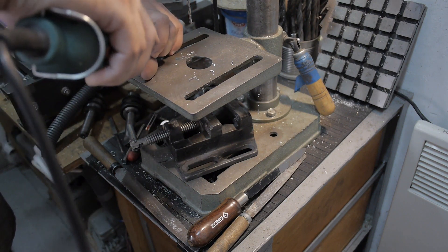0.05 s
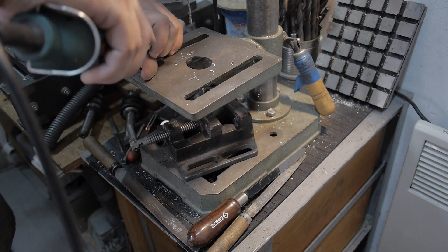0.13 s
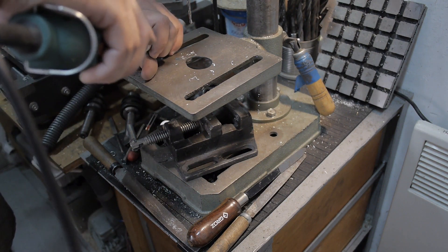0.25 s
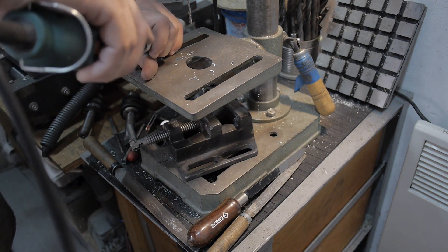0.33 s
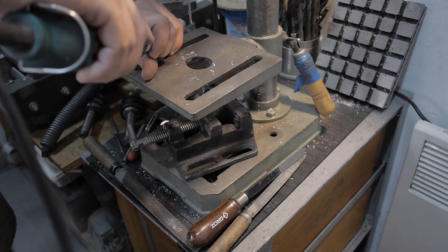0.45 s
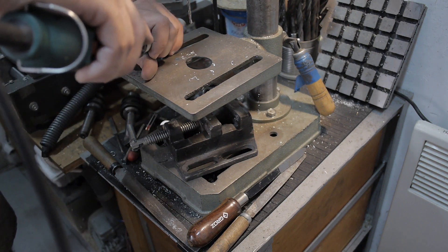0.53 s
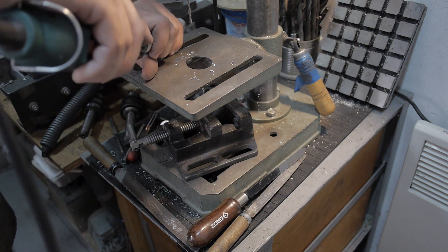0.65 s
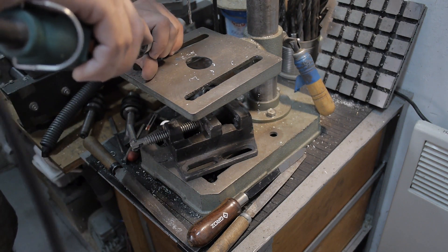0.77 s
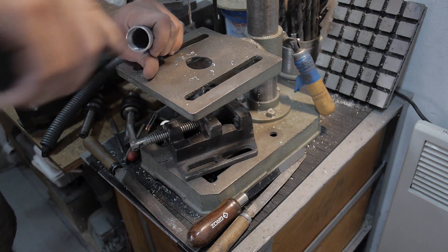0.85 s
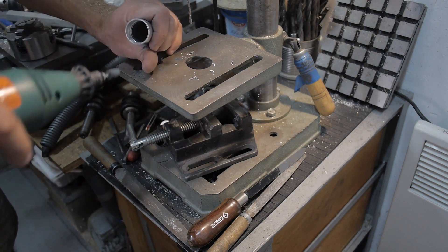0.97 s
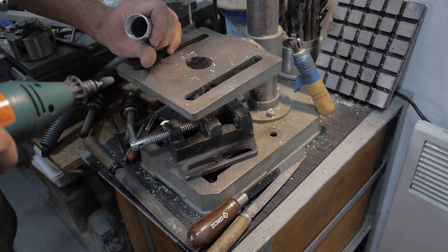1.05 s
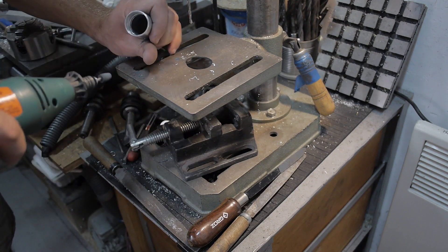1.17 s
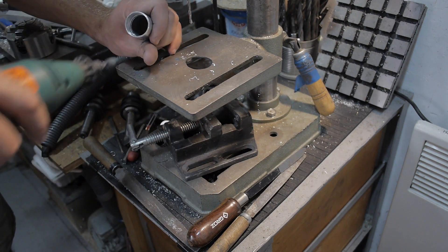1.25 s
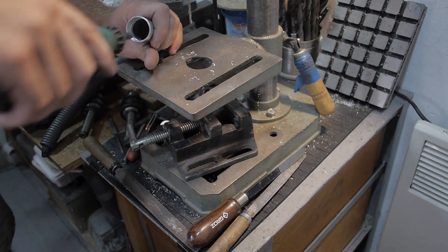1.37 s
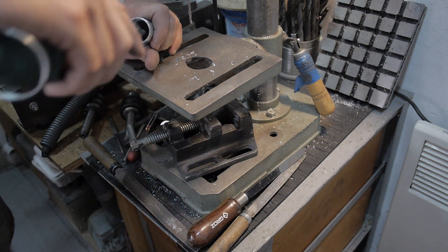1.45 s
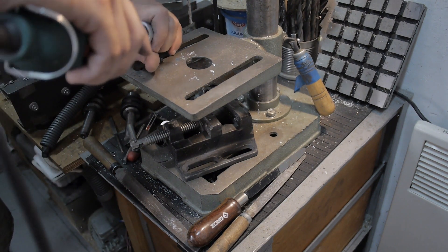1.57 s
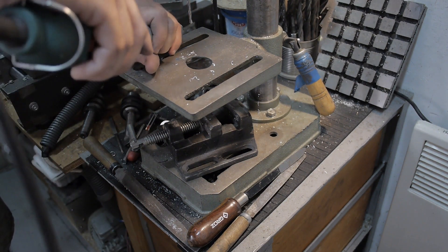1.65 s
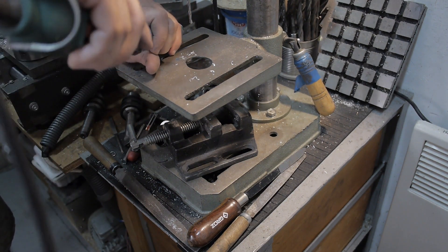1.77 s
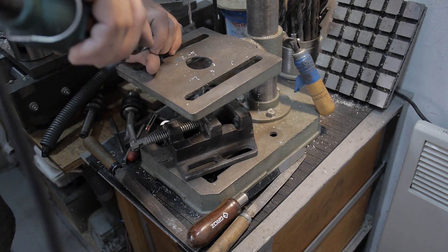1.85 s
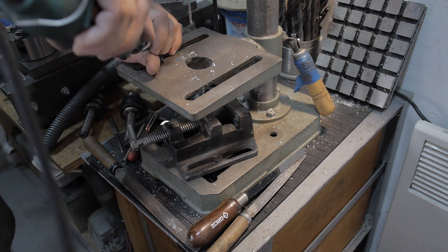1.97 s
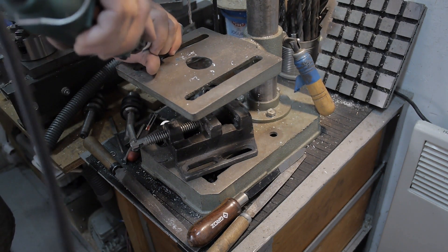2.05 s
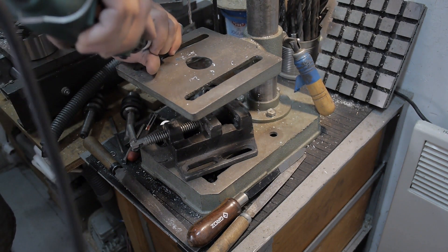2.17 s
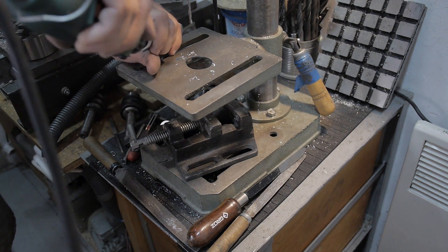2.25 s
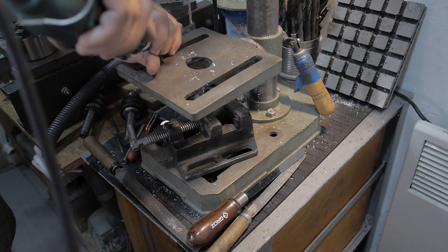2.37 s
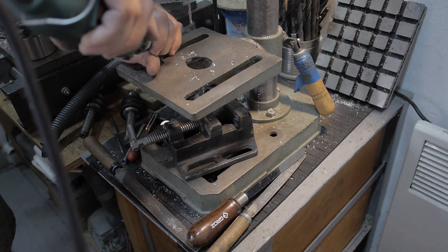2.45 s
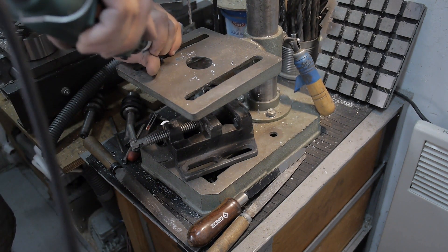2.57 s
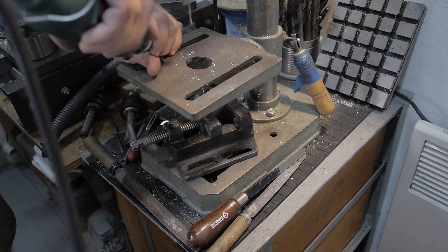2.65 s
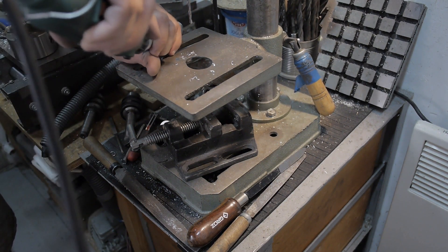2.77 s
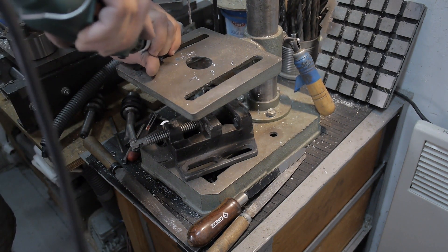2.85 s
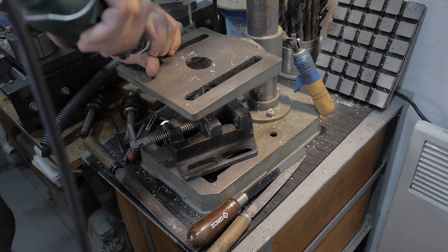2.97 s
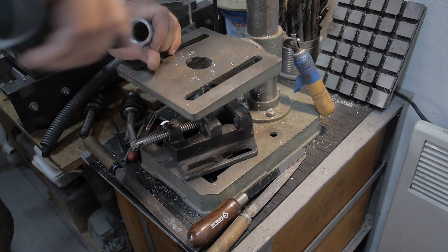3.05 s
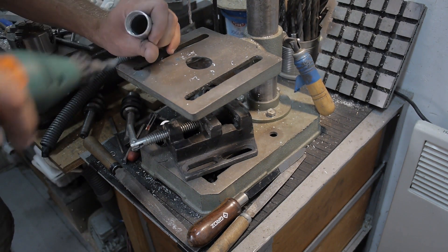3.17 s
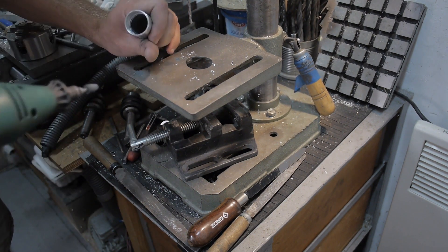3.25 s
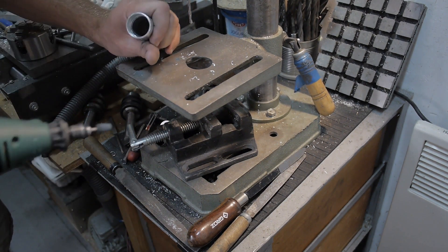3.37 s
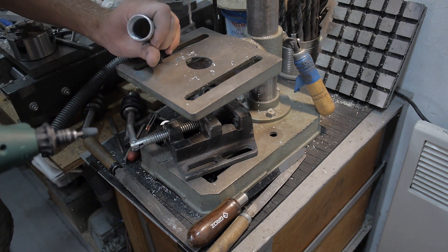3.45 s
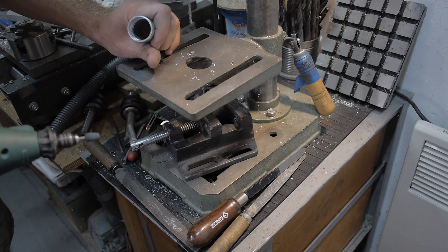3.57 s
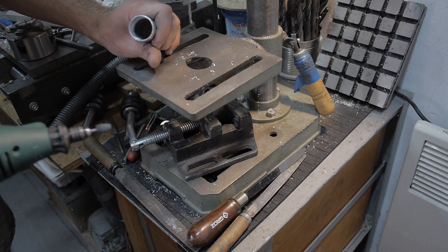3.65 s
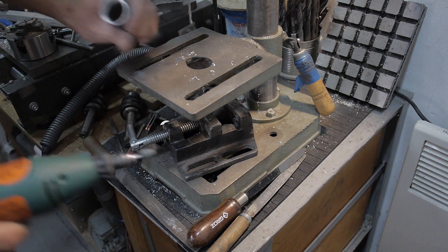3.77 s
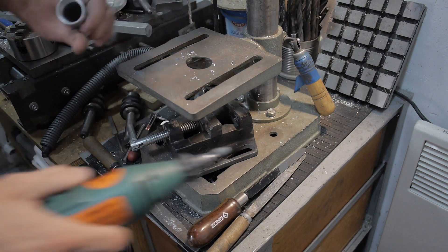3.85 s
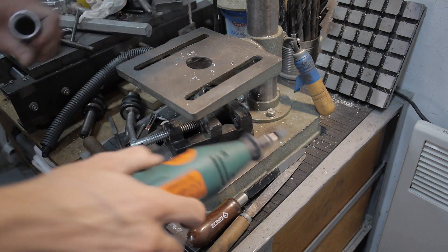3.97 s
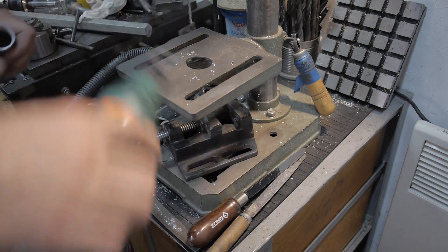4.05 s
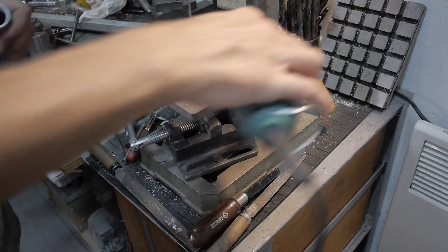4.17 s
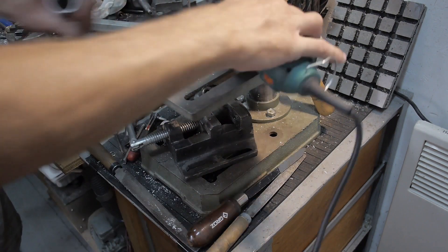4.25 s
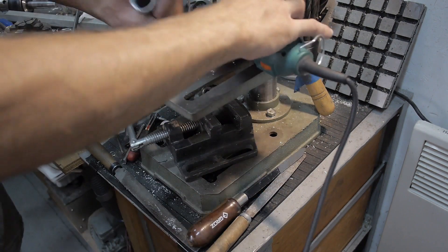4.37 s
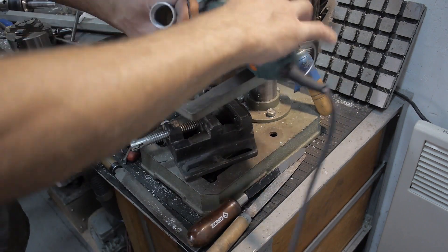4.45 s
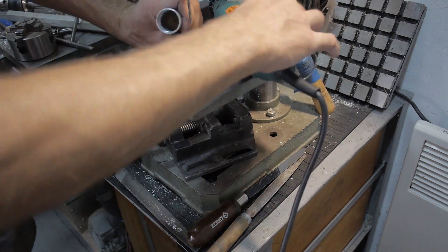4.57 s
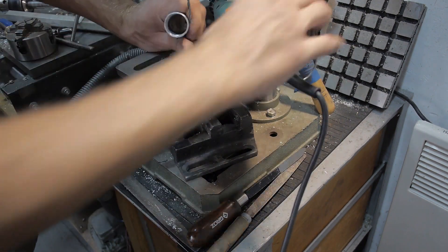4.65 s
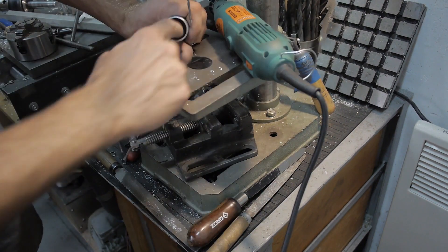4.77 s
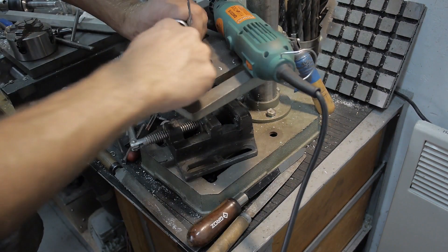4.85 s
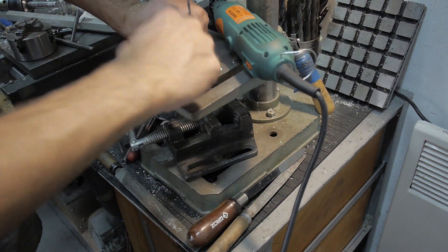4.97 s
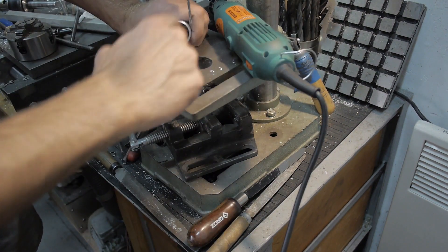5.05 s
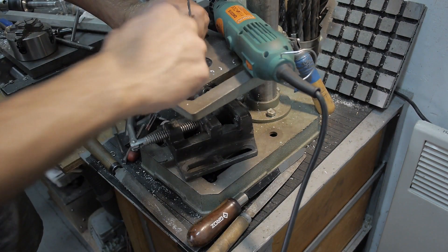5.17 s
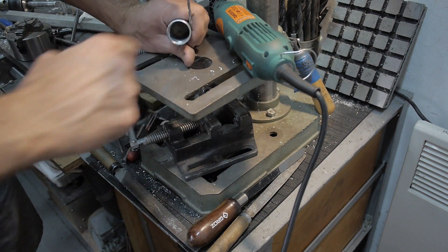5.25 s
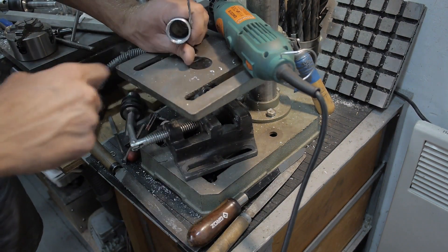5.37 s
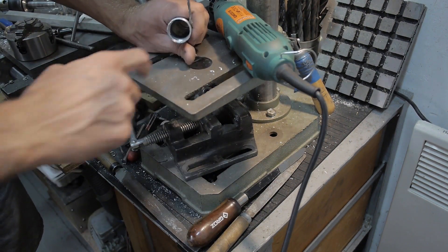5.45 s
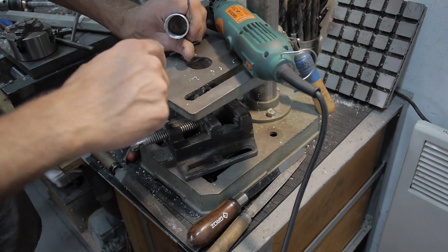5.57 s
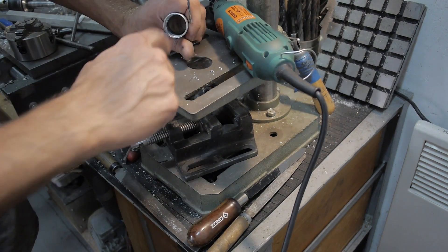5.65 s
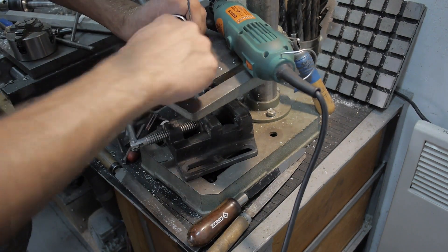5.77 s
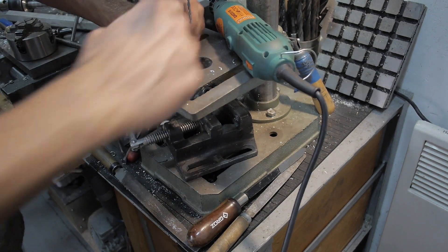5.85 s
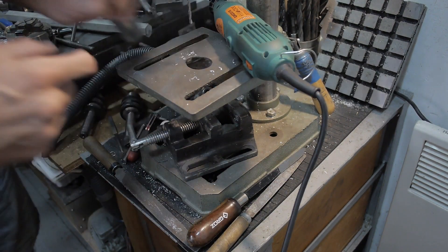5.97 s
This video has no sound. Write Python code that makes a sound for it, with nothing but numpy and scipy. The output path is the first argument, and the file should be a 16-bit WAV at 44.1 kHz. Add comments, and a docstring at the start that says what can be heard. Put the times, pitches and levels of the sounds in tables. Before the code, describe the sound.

A rotary tool grinds a steel ring in two harsh, raspy cuts, whining up between them, then coasts down and is set aside with knocks.

```python
"""A gritty rasp opens the scene: a mains rotary tool grinds a steel ring on a drill-press table, its motor bogged down.
Twice it cuts, in random grain strikes that excite ring, table and bench; twice it lifts and the motor whines up.
Whine and brush ticks follow the shaft angle; brush noise follows its speed. Switched off, the tool coasts to rest.
It is laid down with a few knocks (filtered bursts and decaying modes), then fingers wipe the ring (shaped noise).
A small, cluttered workshop answers with a short diffuse echo over a bed of still-air noise."""
import sys
import numpy as np
from scipy import signal
from scipy.fft import rfft, irfft, next_fast_len
from scipy.io import wavfile
from scipy.ndimage import map_coordinates

SR = 44100
rng = np.random.default_rng(int(sys.argv[2]) if len(sys.argv) > 2 else 0)


def output_pcm(signal):
    """Save a mono or channel-first signal as 16-bit PCM at the path in sys.argv[1].

    Samples are clipped to [-1, 1] before scaling.
    """
    pcm = np.clip(np.atleast_2d(signal).T, -1, 1) * 32767
    wavfile.write(sys.argv[1], SR, np.round(pcm).astype(np.int16))


N = 265477

# still air, noise colour: [f/Hz, relative level/dB per Hz]
AIR_COLOUR = [(8, 5), (20, -8), (45, -12.5), (80, -13.5), (160, -26), (300, -31.5), (700, -35),
              (2200, -42.5), (3500, -39.5), (4700, -38), (5600, -47.5), (11000, -52.5), (13000, -49.5),
              (15500, -54)]
AIR_DB = -56
# decay of the benches and walls: [f/Hz, t60/s]
SHOP_DECAY = [(200, 0.082), (2000, 0.067), (12000, 0.012)]
TOP_HZ = 15500  # upper band limit

# fingers sliding over tool and ring: [t of the peak/s, level/dB, rise/s, fall/s]
WIPE_STROKES = [(4.36, -65, 0.15, 0.043), (4.42, -71.5, 0.0098, 0.022), (4.507, -58.5, 0.015, 0.014),
                (4.87, -64.5, 0.034, 0.029), (5.0, -69.5, 0.045, 0.028), (5.036, -54.5, 0.019, 0.0087),
                (5.126, -63, 0.0034, 0.0175), (5.222, -52, 0.018, 0.008), (5.787, -60.5, 0.014, 0.022),
                (5.865, -54, 0.02, 0.013)]
# dry skin on metal, noise colour: [f/Hz, relative level/dB per Hz]
SKIN_COLOUR = [(150, -53), (250, -17), (385, -4.5), (669, -13.5), (742, -9.5), (961, -13), (1290, -3),
               (2020, -16), (2200, -0.5), (2660, -16), (3060, -6.5), (5410, -14), (6770, -10),
               (11600, -16.5), (15500, -28)]

# the switch clicks, the tool is laid down and rocks: [t/s, rattle level/dB, hardness/dB from one band to the next,
# relative ring level/dB, f rung most/Hz, rise/s, bench thud level/dB, plastic snap level/dB]
KNOCK_HITS = [(3.604, -60.5, 24.5, -67, 3370, 0.0024, -67, -49.5),
              (3.903, -69, -13.5, -38.5, 387, 0.0055, -62, -75),
              (3.933, -68, 6, -71, 3900, 0.003, -85, -82.5), (4.097, -69.5, -1, -74, 3290, .03, -83, -80),
              (4.159, -41.5, 6.5, -53, 790, 0.0042, -60.5, -52),
              (4.209, -66, -6, -62, 546, .009, -78, -85.5), (4.298, -70.5, -5, -74, 830, .005, -78, -69),
              (4.335, -46.5, -8.5, -42.5, 3270, 0.0115, -48.5, -68.5),
              (4.389, -65, -6.5, -73, 3270, 0.0022, -68, -88),
              (4.405, -71, -8.5, -65, 560, 0.0066, -75, -85),
              (4.421, -69.5, -7.5, -70, 830, 0.0035, -84, -83),
              (4.523, -49.5, -8.5, -33, 550, 0.0088, -57, -69),
              (4.556, -79, -4, -55, 660, 0.0068, -80, -90), (4.627, -75.5, 2, -76, 560, .004, -85, -89),
              (4.716, -55, -6, -43.5, 554, 0.007, -67, -87)]
# resonances of the tool on the bench: [f/Hz, width/Hz, relative level/dB]
BODY_MODES = [(204, 20, -16), (375, 75.6, -1), (548, 69, 2), (645, 15, -16.5), (808, 250, -5),
              (1320, 90, -5.5), (1748, 122, -8), (2180, 73, 1.5), (2720, 110, 0), (3294, 50, 11.5),
              (4400, 930, 6)]
# bands of the knock rattle: [low f/Hz, high f/Hz, relative level/dB, share of the decay time]
RATTLE_BANDS = [(284, 930, 1.5, 0.71), (794, 1780, 2, 0.27), (3000, 5500, -4, .9)]
KNOCK_T60_S = .05  # before the band's share and the lengthening by a slow rise
THUD, SNAP = (160, 318, 0.12), (9400, 17000, .055)  # bench, plastic: low f/Hz, high f/Hz, t60/s before the rise

# load changes, each sending the shaft to a new speed: [t/s, speed/turns per s, time constant/s]
LOAD_CHANGES = [(0, 31, .1), (.839, 205, .216), (1.355, 185, .045), (1.622, 37, .08), (3.026, 201, .211)]
OFF_S = 3.6  # the switch opens
START_SPEED, BRAKING = 42, 690  # turns per s; turns per s lost each second once switched off
# mains hum before motor load: [f/Hz, relative level/dB]
HUM_LINES = [(200, -77), (400, -64), (500, -82), (600, -80)]
# resonances of the tool housing: [f/Hz, width/Hz, relative level/dB]
HOUSING_MODES = [(2820, 180, 8.5), (3047, 260, 12.5), (3920, 410, 3.5), (5110, 435, 7.5)]
SHUDDER_SHARE, SHUDDER_WIDTH, SHUDDER_DB = .53, .11, -45  # centre and width as shares of full speed
LOW_TONE_ORDER, LOW_TONE_DB = 4.44, -55  # cycles per turn; level at full speed
# brush and fan noise colour: [f/Hz, relative level/dB per Hz]
BRUSH_COLOUR = [(100, -31.5), (350, -4.5), (600, -6), (1000, -6.5), (1400, 1.5), (2300, 3), (2880, 9.5),
                (3400, 6), (4300, 7), (5500, 4), (8000, 2), (10500, 2.5), (13000, -2), (15500, -14)]

# strong commutator tones: [shaft order/cycles per turn, relative level/dB]
BAR_TONES = [(9, -54), (19, -53), (22, -51), (28, -45), (34, -54), (35, -51), (37, -53), (38, -54),
             (39, -54), (47, -54), (48, -50), (51, -51), (55, -53), (56, -49), (57, -53), (64, -53),
             (67, -57), (72, -49)]
COMB_TILT_DB = -7  # reached at the highest shaft order
# swung round to the ring, the tool turns its upper slot tones away and its brushes towards the listener
SWUNG_S, SWING_S = (1.45, 2.1), 0.025  # start and end; softness of the edges
SHADE_DB, BARS_DB, BARS_SWUNG_DB = -5, -12.5, 11

# slot tone and overtones: [level under power/dB before swells and speed, mains throb/0-1, mains phase swing/rad,
# lag of the swing/rad, coasting level/dB before speed]
SLOT_TONES = [(-42, .5, 0.89, 0.3, -42.5), (-39.5, 0.37, 1.45, 0.5, -52), (-42.5, 0.6, 0.87, -0.67, -51),
              (-44, .3, 0.23, -.3, -51.5), (-51.5, 0.5, 0.52, .3, -48.5), (-53, 0.3, .8, 0.36, -57.5),
              (-48, 0.6, 0.89, .3, -46.5), (-53, 0.3, 1.1, 0.25, -55), (-52, 0.5, 1.0, .3, -64.5),
              (-59, 0.6, 1.1, .3, -55.5)]
SLOT_COUNT = 8  # cycles per turn of the lowest slot tone
SLOT_ROUGH_RAD = .08  # bearing play, per overtone number
# slow rises and falls of the whine: [t/s, level offset/dB]
WHINE_SWELLS = [(.93, 2), (0.999, 3), (1.09, 0.5), (1.15, 1), (1.25, -2.5), (1.31, 0), (1.38, -1),
                (1.43, 3), (1.6, -3.5), (3.11, -5.5), (3.17, 6), (3.21, 0.5), (3.29, -1), (3.42, 0.5),
                (3.6, -1.5)]
COAST_FADE, COAST_WAVER = 1.5, .9  # power of speed for the coasting level; strength of its phase waver

# the bit pressed on the ring: [start t/s, end t/s]
CUT_TIMES = [(0, 0.872), (1.586, 3.062)]
# hand pressure, one list per cut, before the layer gains: [t/s, rasp level/dB, notes level/dB, drone level/dB]
HAND_PRESSURE = [
    [(0.0, -34.5, -40.5, -50), (0.078, -38, -39.5, -43), (0.092, -32.5, -34, -48), (0.132, -37.5, -47, -43),
     (0.322, -38.5, -42, -48.5), (0.374, -38, -38, -44.5), (0.392, -40.5, -40, -57),
     (0.44, -37.5, -49, -41.5), (0.486, -40, -41, -52), (0.498, -41.5, -45, -43.5), (0.58, -40, -36.5, -48),
     (0.606, -42, -42, -46), (0.818, -41.5, -38, -50), (0.85, -43.5, -41.5, -45)],
    [(1.6, -35.5, -48.5, -54), (1.66, -32.5, -34.5, -43.5), (1.704, -41.5, -52.5, -60),
     (1.736, -37.5, -41.5, -61), (1.772, -42.5, -48.5, -51.5), (1.82, -40, -38.5, -48.5),
     (1.86, -38, -51, -48), (1.94, -37.5, -40.5, -50.5), (2.116, -38.5, -40.5, -47.5),
     (2.172, -39.5, -47, -49.5), (2.216, -40, -39.5, -48), (2.714, -38.5, -37, -49.5),
     (2.966, -39.5, -39.5, -47), (3.04, -39.5, -35, -51)],
]
RASP_DB, NOTES_DB, DRONE_DB = 2.5, 6.5, 0  # gains of the three layers of the cut
PRESS_S, LIFT_S = 0.0039, 0.023  # softness of the contact as it is made and lost
# abrasion colour: [f/Hz, relative level/dB per Hz]
RASP_COLOUR = [(400, -47.5), (700, -22), (1050, -6), (1400, -1), (2000, 0), (2900, -0.5), (3350, -1.5),
               (3800, 0), (4200, -8), (4700, -4), (6000, -10), (6800, -10), (7600, -13.5), (11000, -22),
               (15000, -29.5)]
# resonances of the gripped ring: [f/Hz, width/Hz, relative level/dB]
RING_MODES = [(1462, 350, -8.5), (2950, 490, -3), (3600, 350, -2), (4016, 300, -0.5), (6690, 210, 7.5)]
# resonances of the drill-press table: [f/Hz, width/Hz, relative level/dB]
TABLE_MODES = [(411.4, 20, -2.5), (527.5, 21.3, 5.5), (595, 140, -5.5), (815, 130, -13)]
# dust colour: [f/Hz, relative level/dB per Hz]
GRIT_COLOUR = [(3000, -15), (7000, -0.5), (9000, -1.5), (11500, -5), (15000, -24.5)]
# resonances of the bench: [f/Hz, width/Hz, relative level/dB]
BENCH_MODES = [(134.3, 44, -10.5), (191.7, 28, 8.5), (272.5, 81, -1)]
GRIT_DB, JUDDER_DB = -17, -29  # dust and bench, relative to the rasp
# notes drawn from the ring: [f/Hz, level relative to one another/dB, waver/share of the pitch]
RING_NOTES = [(1500, -21.5, 0.03), (2280, -21, .04), (2903, -14.5, 0.018), (3788, -9, 0.011),
              (4100, -13.5, .009), (6950, -22, 0.014)]
# the grip retunes the ring: [t/s, pitch ratio]
GRIP_TUNING = [(0, 1.03), (.87, 1.01), (1.801, 1.07), (2.301, 1.0), (3.05, 0.99)]
# the bit catches, bucks and shakes the bench: [t/s, swell length/s, shake level/dB]
BIT_CATCHES = [(0.047, 0.066, -57.5), (0.357, 0.047, -61), (0.857, 0.036, -65.5), (1.648, 0.034, -48),
               (1.91, 0.077, -61), (2.035, 0.051, -57), (2.53, 0.025, -66)]
# the bit loses its bite and skids: [start t/s, end t/s, hiss level/dB]
BIT_SKIDS = [(0.095, 0.101, -44.5), (1.663, 1.768, -40)]
SKID_EDGE_S = 0.0017
# the bit squeals: [t/s, f/Hz at the peak, level/dB before trim, length/s]
BIT_SQUEALS = [(0.086, 9000, -36, 0.021), (1.658, 4090, -24.5, 0.0083), (1.678, 9420, -24, 0.0092),
               (1.689, 8990, -24, .012), (1.71, 8470, -29, 0.033), (1.734, 6900, -27.5, 0.018),
               (1.752, 11200, -34, 0.013), (1.946, 3820, -32, .02), (2.314, 3760, -24, 0.0075),
               (2.382, 3760, -30, .011), (2.413, 3790, -27.5, 0.0083), (2.484, 3720, -23.5, 0.0095)]
CHIME_HZ, CHIME_DB, CHIME_DELAY_S, CHIME_S = 705, -57.5, 0.074, 0.058  # soft note after each cut


def amp(db):
    """Decibels to gain."""
    return 10 ** (np.asarray(db) / 20)


def unit(x):
    """Scaled to rms 1."""
    return x / np.sqrt(np.mean(x ** 2) + 1e-20)


def clock():
    """Time of every sample in seconds."""
    return np.arange(N) / SR


def along(points, hz):
    """Interpolate (f, value) points on a log frequency axis."""
    f, v = np.transpose(points)
    return np.interp(np.log(hz + 1), np.log(f + 1), v)


def wobble(rate):
    """A smooth random curve, rate knots a second."""
    knots = rng.standard_normal(int(N * rate / SR) + 4)
    return map_coordinates(knots, [clock() * rate])


def during(start, end, rise, fall):
    """A soft gate: 1 from start to end, with tanh edges of time constants rise and fall."""
    opening = 1 + np.tanh((clock() - start) / rise)
    closing = 1 - np.tanh((clock() - end) / fall)
    return opening * closing / 4


def swell(s, length):
    """A bell-shaped rise and fall around time s."""
    return np.exp(-((clock() - s) / length) ** 2)


def filtered(x, response):
    """x times a complex response of frequency."""
    size = x.shape[-1]
    m = next_fast_len(size + 8192)
    return irfft(rfft(x, m) * response(np.fft.rfftfreq(m, 1 / SR)), m)[..., :size]


def resonances(modes, f):
    """Summed response of (f, width, level) modes."""
    return sum(amp(db) * 1j * f * w / (c * c - f * f + 1j * f * w) for c, w, db in modes)


def hiss(spectrum):
    """Diffuse stereo noise of rms 1."""
    return unit(filtered(rng.standard_normal((2, N)), lambda f: amp(along(spectrum, f))))


def shop(x):
    """A short, diffuse answer from the benches and walls: noise that decays at its own rate in each band."""
    hz, t, z = signal.stft(rng.standard_normal((2, SR // 3)), SR, nperseg=256)
    decay = amp(-60 * t / along(SHOP_DECAY, hz)[:, None])
    tail = signal.istft(z * decay, SR, nperseg=256)[1]
    delayed = np.pad(x, ((0, 0), (130, 0)))  # samples of pre-delay
    return signal.fftconvolve(delayed, tail / np.linalg.norm(tail[0]), axes=1)[:, :N]


def scattered(x, depth_db, spacing_hz=130):
    """Echoes off the clutter give each channel its own peaks and dips, so gliding tones break into patches."""
    knots = rng.standard_normal((2, 400))

    def patches(f):
        curves = [map_coordinates(k, [f / spacing_hz], mode="mirror") for k in knots]
        return amp(depth_db * np.array(curves))
    return filtered(x, patches)


def wipes():
    """Dry skin slides over metal in short, grainy strokes."""
    t = clock()
    stroke = 0
    for s, db, rise, fall in WIPE_STROKES:
        spread = np.where(t < s, rise, fall)
        stroke = stroke + amp(db) * np.exp(-((t - s) / spread) ** 2 / 2)
    return stroke * amp(2.75 * wobble(600)) * hiss(SKIN_COLOUR)


def rattle_band(x, lo_hz, hi_hz):
    """The part of a rattle between two frequencies."""
    sos = signal.butter(2, [lo_hz, min(hi_hz, SR / 2 - 1)], "band", fs=SR, output="sos")
    return signal.sosfilt(sos, x)


def knocks(colour_db=6, focus_octaves=0.31):
    """Each contact is a short plastic-on-steel rattle that rings the body, with a bench thud and a plastic snap."""
    out, t = np.zeros((2, N + SR)), np.arange(SR // 4) / SR
    for s, knock_db, hardness_db, ring_db, focus_hz, rise_s, thud_db, snap_db in KNOCK_HITS:
        rise = 1 - np.exp(-t / rise_s)
        noise = rng.standard_normal((2, len(t)))
        rattle = filtered(noise, lambda f: 1 + amp(colour_db) * resonances(BODY_MODES, f))
        parts = [(*THUD, thud_db), (*SNAP, snap_db)]
        for step, (lo, hi, db, life) in zip((-1, 0, 1), RATTLE_BANDS):
            parts.append((lo, hi, KNOCK_T60_S * life, knock_db + db + step * hardness_db))
        hit = np.zeros((2, len(t)))
        for lo, hi, t60, db in parts:
            part = rattle_band(rattle, lo, hi) * rise * amp(-60 * t / (t60 + rise_s / 2))
            hit += amp(db) * part / np.std(part[:, :SR // 50])  # level set over the first 20 ms
        for hz, width, db in BODY_MODES:
            share = np.exp(-(np.log2(hz / focus_hz) / focus_octaves) ** 2)
            phase = rng.uniform(0, 0.93, (2, 1))
            ring = np.exp(-np.pi * width * t) * np.sin(2 * np.pi * hz * t + phase)
            hit += amp(ring_db + db + 7.0) * share * rise * ring
        out[:, round(s * SR):][:, :len(t)] += hit
    return out[:, :N]


def chime():
    """A soft sine note swells and fades just after each cut."""
    level = sum(swell(end + CHIME_DELAY_S, CHIME_S) for _, end in CUT_TIMES)
    return amp(CHIME_DB) * level * np.sin(2 * np.pi * CHIME_HZ * clock() + rng.uniform(0, 1, (2, 1)))


def shaft():
    """Rotor speed (eased towards each load's goal, then braked by friction), its angle and the mains pulse phase."""
    t = clock()
    speed = np.full(N, float(START_SPEED))
    for s, goal, lag in LOAD_CHANGES:
        i = round(s * SR)
        speed[i:] = goal + (speed[i] - goal) * np.exp(-(t[i:] - s) / lag)
    speed = np.maximum(speed - BRAKING * np.maximum(t - OFF_S, 0), 0)
    speed = speed * (1 + .0003 * wobble(60))
    mains = 2 * np.pi * 100 * t  # power pulses at twice the mains frequency
    return speed, 2 * np.pi * np.cumsum(speed) / SR, mains


def powered():
    """1 while the switch is closed, then a quick ramp to 0."""
    return np.clip((OFF_S - clock()) / 0.00536 + 1, 0, 1)


def swung():
    """1 while the tool points at the ring, else 0, with soft edges."""
    return during(*SWUNG_S, SWING_S, SWING_S)


def hum(speed, mains):
    """The stator hums at multiples of the mains pulses, more strongly while the motor labours."""
    load = 1 - 0.63 * np.clip(speed / 150, 0, 1)
    lines = 0
    for hz, db in HUM_LINES:
        lines = lines + amp(db) * np.sin(round(hz / 100) * mains + rng.uniform(0, 2, (2, 1)))
    return 1.73 * powered() * load * lines


def shudder(speed, mains):
    """Near half speed under power, the rotor shudders and rattles the lowest resonance of the housing."""
    near_critical = np.exp(-((speed / speed.max() - SHUDDER_SHARE) / SHUDDER_WIDTH) ** 2)
    ring = unit(filtered(rng.standard_normal((2, N)), lambda f: resonances(HOUSING_MODES[:1], f) ** 2))
    return amp(SHUDDER_DB) * powered() * near_critical * (1 + .6 * np.cos(mains)) * ring


def low_tone(speed, angle, flicker_db=4.5):
    """A low, unsteady tone that follows the shaft and comes up near full speed."""
    share = speed / speed.max()
    phase = LOW_TONE_ORDER * angle + 0.66 * np.array([wobble(60), wobble(60)])
    return amp(LOW_TONE_DB + flicker_db * wobble(25)) * share ** 9 * powered() * np.sin(phase)


def brushes(speed, angle, mains, spark_db=3, settle_db=-30, settle_s=0.096):
    """Brush and fan noise grows with speed and flutters with each turn; its sparking stops with the power."""
    flutter = 1 + 0.051 * np.sin(angle) + 0.04 * powered() * np.cos(mains)
    drag = (speed / speed.max() + 1e-6) ** 0.71 * np.tanh(speed / 45)
    stop_s = OFF_S + np.interp(OFF_S, clock(), speed) / BRAKING
    last_turn = amp(settle_db) * swell(stop_s, settle_s)
    sparking = amp(spark_db * (powered() - 1))
    return (drag + last_turn) * flutter * sparking * hiss(BRUSH_COLOUR)


def commutator(speed, angle, comb_db=-55, flicker_db=7.0, fade=2.53):
    """Brushes tick over uneven bars: strong, flickering orders on a weak comb that repeats every turn."""
    tones = 0
    for order, db in BAR_TONES:
        level = amp(db + flicker_db * wobble(35))
        tones = tones + level * np.sin(order * angle + rng.uniform(0, 2 * np.pi, (2, 1)))
    orders = np.arange(18, 72)
    grid = np.linspace(0, 2 * np.pi, 2048)
    phases = rng.uniform(0, 2 * np.pi, (2, 1, len(orders)))
    turns = np.sin(np.outer(grid, orders) + phases) @ amp(COMB_TILT_DB * orders / orders.max())
    comb = amp(comb_db) * np.array([np.interp(angle % (2 * np.pi), grid, turn) for turn in turns])
    share = speed / speed.max()
    facing = amp(BARS_DB + BARS_SWUNG_DB * swung())
    return tones * powered() * share ** 3 * facing + comb * share ** fade


def whine(speed, angle, mains, lead_s=.00007, strain=1.2, flicker_db=2.0, strain_flicker_db=3, drift_db=1.1,
          fade=1.54):
    """Slot tones throb with the mains and ring through the housing; they waver while the rotor strains or coasts."""
    on = powered()
    share = speed / speed.max()
    slip = 1 - share
    swells_db = np.interp(clock(), *np.transpose(WHINE_SWELLS))
    x = np.zeros(N)
    for k, (db, throb, swing, lag, coast_db) in enumerate(SLOT_TONES, 1):
        order = k * SLOT_COUNT
        waver = strain * slip * order / 2 + (1 - on) * COAST_WAVER * k / 2
        bend = on * swing * np.cos(mains - lag) + waver * wobble(90) / 2
        bend += SLOT_ROUGH_RAD * k * wobble(450)
        flicker = (flicker_db + strain_flicker_db * slip) * wobble(55)
        unsteady = amp(flicker + drift_db * wobble(14))
        shade_db = SHADE_DB * swung() * (k > 3)
        driven = on * amp(db + swells_db + shade_db) * share ** fade
        coasting = (1 - on) * amp(coast_db) * share ** COAST_FADE
        throbbing = 1 + on * throb * np.cos(mains)
        x += (driven + coasting) * unsteady * throbbing * np.sin(order * angle + bend)
    sides = np.array([[1], [-1]])  # the left channel leads the right

    def radiation(f):
        # the small housing radiates little below its first resonances
        return (1 + resonances(HOUSING_MODES, f)) * f ** 3 / (f ** 3 + 1900 ** 3)
    return filtered(x, lambda f: radiation(f) * np.exp(1j * np.pi * f * lead_s * sides))


def squeals():
    """Brief stick-slip chirps of the bit, each sagging in pitch."""
    out = np.zeros((2, N))
    waver = wobble(500)
    for s, hz, db, length in BIT_SQUEALS:
        t = clock() - s
        near = abs(t) < 2 * length
        pitch = hz * (1 - 4.3 * t[near] + 0.0095 * waver[near])
        phase = 2 * np.pi * np.cumsum(pitch) / SR
        bell = np.exp(-(2 * t[near] / length) ** 2)
        out[:, near] += amp(db - 2.5) * bell * np.sin(phase + [[0], [1.3]])
    return out


def singing(flare_db=3.5, flares_per_s=90, wavers_per_s=45, rough_rad=0.96):
    """The bit sticks and slips, so each note of the ring flares up in short, wavering bursts."""
    grip = np.interp(clock(), *np.transpose(GRIP_TUNING))
    out = np.zeros((2, N))
    for hz, db, waver in RING_NOTES:  # each note wanders on its own
        pitch = hz * grip * (1 + waver * wobble(wavers_per_s))
        phase = 2 * np.pi * np.cumsum(pitch) / SR + rough_rad * wobble(400)
        flare = unit(amp(flare_db * np.minimum(wobble(flares_per_s), 1.6)))
        drift = 2 * np.array([wobble(20), wobble(20)])  # separate phase drift on each side
        out += amp(db) * flare * unit(np.sin(phase + drift))
    return out


def grinding(angle, strikes_hz=3500, spread_db=2.0, scrape=0.66, runout=0.068, hand_db=0.68):
    """Abrasive grains strike at random, harder at points of each turn; ring, table and bench answer hand pressure."""
    per_turn = 1 + runout * np.cos(angle) + 0.14 * np.cos(6 * angle)
    force = per_turn * amp(1.2 * wobble(55) + 0.547 * wobble(350))
    strikes = (rng.random(N) < strikes_hz / SR) * amp(spread_db * rng.standard_normal(N))
    # both channels hear each strike, but by scattered paths of either sign
    drive = force * (unit(strikes) * rng.choice([-1, 1], (2, N)) + scrape * rng.standard_normal((2, N)))
    rasp = unit(filtered(drive, lambda f: amp(along(RASP_COLOUR, f)) * (1 + resonances(RING_MODES, f))))
    drone = unit(filtered(drive, lambda f: resonances(TABLE_MODES, f) / (1 + (f / 1300) ** 4)))
    grit = unit(filtered(drive, lambda f: amp(along(GRIT_COLOUR, f))))
    judder = unit(filtered(drive, lambda f: resonances(BENCH_MODES, f) / (1 + (f / 450) ** 4)))
    notes = singing()
    abrasion = rasp + amp(GRIT_DB) * grit + amp(JUDDER_DB) * judder
    cut = 0
    for (start, end), levels in zip(CUT_TIMES, HAND_PRESSURE):
        s, *columns = np.transpose(levels)
        rasp_db, notes_db, drone_db = [np.interp(clock(), s, column) for column in columns]
        layers = amp(rasp_db + RASP_DB) * abrasion
        layers = layers + amp(notes_db + NOTES_DB) * notes
        layers = layers + amp(drone_db + DRONE_DB) * drone
        cut = cut + during(start, end, PRESS_S, LIFT_S) * layers
    shake = sum(amp(db) * swell(s, length) for s, length, db in BIT_CATCHES)
    skid = sum(amp(db) * during(start, end, SKID_EDGE_S, SKID_EDGE_S) for start, end, db in BIT_SKIDS)
    return amp(hand_db * wobble(40.02)) * cut + shake * judder + skid * grit


def scene():
    """Motor, cut and handling in the room, over its still air."""
    speed, angle, mains = shaft()
    slots = scattered(whine(speed, angle, mains), depth_db=3) * amp([[1.5], [-1.5]])  # leans left
    bars = scattered(commutator(speed, angle), depth_db=3.5)
    motor = slots + bars + low_tone(speed, angle) + shudder(speed, mains) + hum(speed, mains)
    noise = amp(-38.0) * brushes(speed, angle, mains) + grinding(angle) + squeals() + chime()
    near = motor + noise * amp([[.4], [-.4]]) + knocks() + wipes()
    room = amp(-11) * shop(near)
    return near + room + amp(AIR_DB) * hiss(AIR_COLOUR)


def record(dry):
    """Nothing is kept from the band limit upwards."""
    return filtered(dry, lambda hz: hz < TOP_HZ)


dry = scene()
out = record(dry)
output_pcm(out)
```